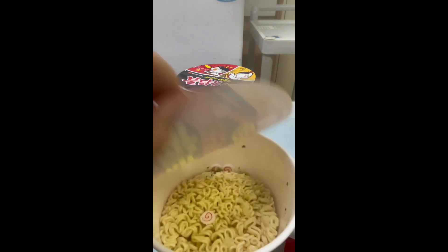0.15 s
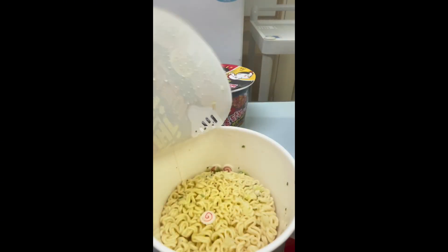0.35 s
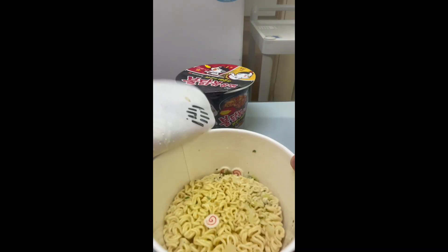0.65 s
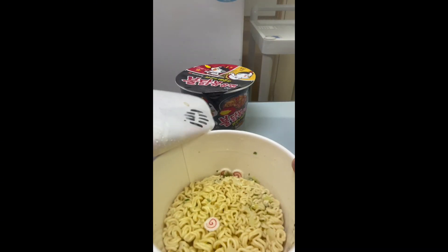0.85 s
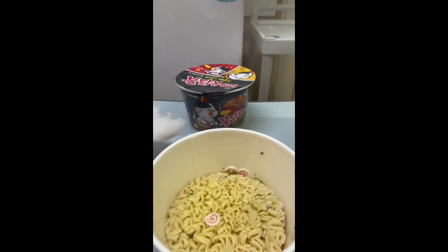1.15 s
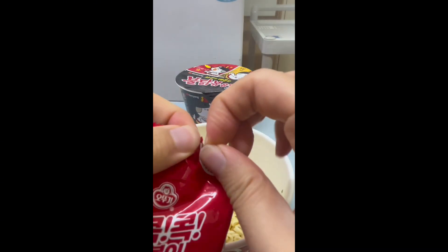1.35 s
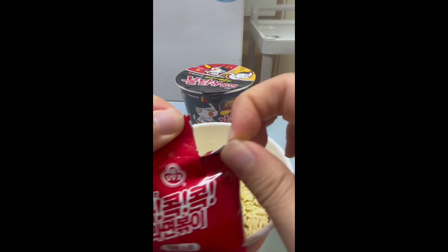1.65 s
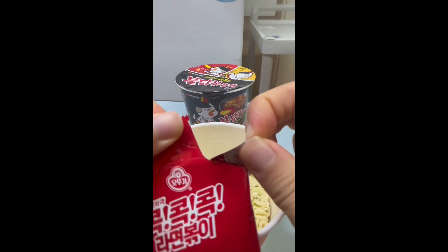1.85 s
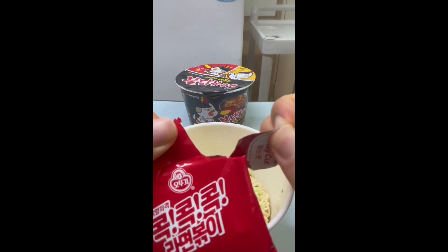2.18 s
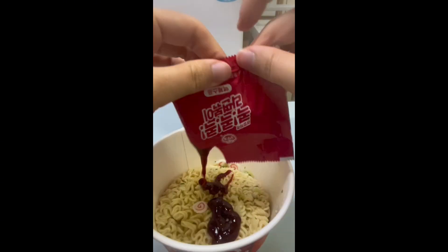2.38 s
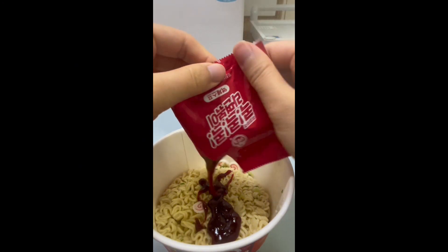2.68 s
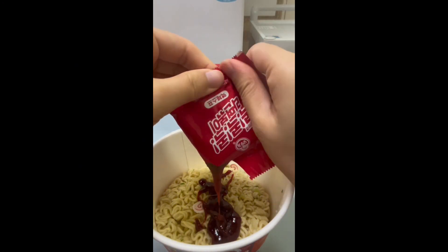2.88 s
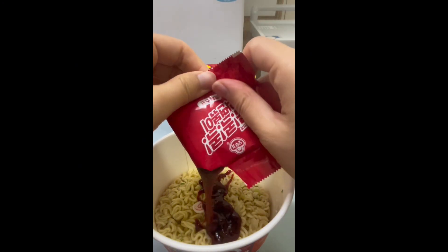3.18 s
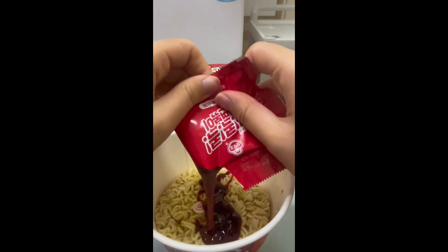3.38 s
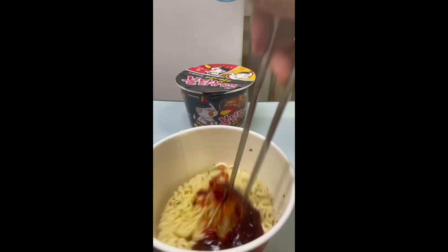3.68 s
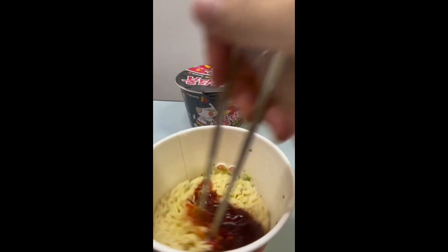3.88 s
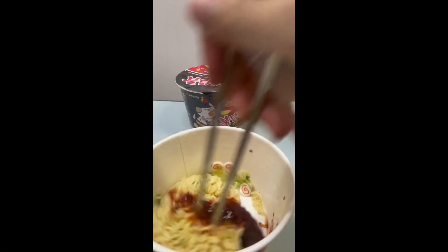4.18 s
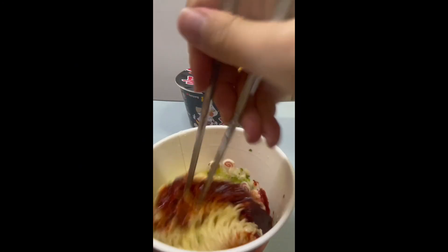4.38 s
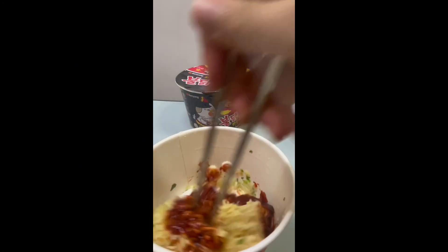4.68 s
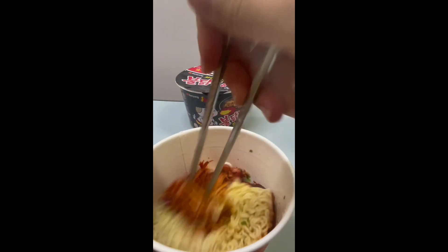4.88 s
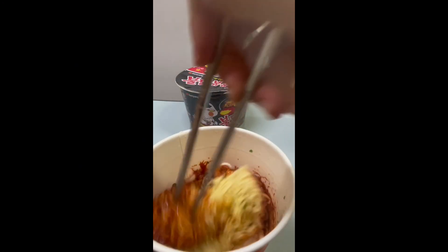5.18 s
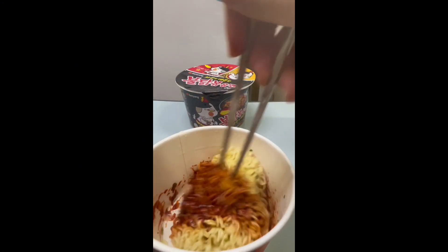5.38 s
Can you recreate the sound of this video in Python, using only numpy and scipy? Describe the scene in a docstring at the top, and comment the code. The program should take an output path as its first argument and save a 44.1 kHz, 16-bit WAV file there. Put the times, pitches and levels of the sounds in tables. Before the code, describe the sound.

Close up in a small, quiet kitchen, a paper lid comes off a cup with a quick rub and hollow pops. A plastic sauce pouch is picked up with soft flops and rustles, torn with sharp bright snaps, then squeezed with thin crackles. After a lull, chopsticks stir wet noodles, with sticky smacks and light knocks on the paper cup. A close stereo microphone catches little room echo.

```python
"""A paper lid is pulled off a cup of instant noodles, with a rub and a row of pops, in a small kitchen.
A plastic sauce pouch is then picked up, torn open and squeezed out; metal chopsticks stir the wet noodles
and knock on the paper cup. Rubbing is noise and tiny random catches, snaps and knocks are pushes into
damped resonances, squelches are short sinking tones, and the table is a low boom under the hands.
Two microphone ports hear it all, with short echoes, a room tail and quiet air."""
import sys
import numpy as np
from scipy import signal
from scipy.fft import rfft, irfft
from scipy.io import wavfile
from scipy.ndimage import uniform_filter1d

SR = 44100
rng = np.random.default_rng(int(sys.argv[2]) if len(sys.argv) > 2 else 0)


def bounce(signal):
    """Save signal as a 16-bit WAV file at the path given by the first command-line argument."""
    frames = np.transpose(np.atleast_2d(signal))
    limited = np.clip(frames, -1, 1)
    pcm = np.round(limited * 32767).astype(np.int16)
    wavfile.write(sys.argv[1], SR, pcm)


N = 244314

TIME = np.arange(N) / SR  # seconds
FFT_SIZE = 2 ** 18
HZ = np.fft.rfftfreq(FFT_SIZE, 1 / SR) + 1e-3  # just above zero, so it can be divided by

# Strokes of rubbing swell to a peak and die away; brightness is extra level in the treble
# columns: peak_s, rise_s, fall_s, level_db, brightness_db
LID_PEEL = [(0.044, 0.0082, 0.004, -38, -22), (0.061, 0.0039, 0.0056, -29.5, 2),
            (0.08, 0.029, 0.063, -49, 6.5), (0.3, 0.075, 0.061, -64.5, -11)]
PICKING_UP = [(0.495, 0.0045, 0.014, -57, 3.5), (0.585, 0.066, 0.21, -56.5, -4.5),
              (0.685, 0.0093, 0.023, -59.5, 1), (0.8, 0.014, 0.16, -49.5, -1),
              (0.98, 0.098, 0.11, -58.5, 0), (1.088, 0.018, 0.046, -43.5, -3),
              (1.25, 0.06, 0.038, -62, 4.5)]
TEARING = [(1.43, 0.00839, 0.03624, -50, -1), (1.465, 0.028, 0.025, -44, 5),
           (1.58, 0.022, 0.0033, -56.5, 8), (1.637, 0.015, 0.017, -54.5, 6.5),
           (1.815, 0.038, 0.014, -50, 5), (1.955, 0.025, 0.028, -56.5, 5.5),
           (1.985, 0.0295, 0.0082, -51, -26.5), (2.268, 0.011, 0.021, -46, -21.5),
           (2.287, 0.032, 0.0059, -46.5, 4.5), (2.33, 0.016, 0.081, -65.5, 7.5),
           (2.402, 0.006, 0.0054, -42, -6)]
STIRRING = [(3.74, 0.027, 0.079, -62.5, 4), (4.02, 0.042, 0.056, -66, 14.5), (4.19, 0.064, 0.044, -51, 1.5),
            (4.323, 0.024, 0.035, -55, 7), (4.43, 0.014, 0.044, -46.5, 2.5),
            (4.595, 0.01905, 0.058, -50, 1.5), (4.7, 0.04525, 0.14, -51.5, -5),
            (4.85, 0.017, 0.071, -51.5, 4), (4.955, 0.026, 0.059, -53.5, 3),
            (5.175, 0.048, 0.028, -52, 4.5), (5.255, 0.098, 0.041, -54, 4), (5.36, 0.039, 0.22, -55.5, -2),
            (5.52, 0.02104, 0.021, -49.5, 2)]
NOODLE_DRAG = (4, 0.74, 17.5, -62, -4)  # one such row: a long stroke under all the stirring
PAPER_HZ = 900  # the ring at which the thud rules for paper and creases are set
CREASE_SLIP_S, CREASE_THUD_DB = 0.0013046, -12.5  # thud is relative to the ring


def pouch():
    """The plastic pouch rustles in the hands, tears along its top and crackles as it is squeezed."""
    # Strokes of the squeeze: peak_s, rise_s, fall_s, level_db, brightness_db
    squeeze_strokes = [(2.67, 0.028, 0.055, -74.5, 19.5), (2.92, 0.18, 0.33, -65, 6),
                       (3.2, 0.059, 0.1, -94, 10), (3.52, 0.071, 0.0096, -55, -9),
                       (3.66, 0.043, 0.13, -66, -25)]
    # Tone of the rubbing: pitch_hz, level_db (relative)
    picking_tone = [(130.0, 14), (300.0, 4), (550.0, 6.5), (850.0, 8.5), (1150.0, -0.5), (1600.0, -3.5),
                    (2500.0, -6.5), (3700.0, -6), (4700, -11.5), (5600, -14), (6600, -14), (8000.0, -13),
                    (11000.0, -26.5), (15000.0, -24)]
    pouch_tone = [(130.0, 6), (300.0, 2.5), (550.0, 2.5), (850.0, -0.5), (1150.0, -3), (1600.0, -14.5),
                  (2500.0, -8.5), (3700.0, -9), (5500.0, -6.5), (8000.0, -9.5), (11000.0, -11),
                  (15000.0, -17)]
    # The taut film snaps as it is gripped and torn; tautness narrows the resonances
    # columns: start_s, thud_db, ring_db, ring_hz, crack_db, crack_hz, slip_s, tautness (plain factor)
    film_rows = [(0.5942, -61, -42.5, 880, -45, 4400, 0.0015, 0.88),
                 (0.7885, -46, -42, 1252, -38, 4140, 0.0018, 0.91),
                 (1.0823, -50, -35, 820, -29.5, 5700, 0.0038, 0.57),
                 (1.2686, -55, -35, 1080, -29, 2550, 0.0016, 1.8),
                 (1.2692, -50, -29.5, 2480, -27.5, 4570, 0.0012, 6.1),
                 (1.335, -50, -49, 1000, -31.5, 4130, 0.0027, 1.2),
                 (1.412, -30, -14.5, 2420, -9.5, 9250, 0.0014, 1.78),
                 (1.4472, -56, -53, 2540, -28, 6950, 0.0015, 2.8),
                 (1.4594, -59, -31, 2520, -30, 6600, 0.00113, 1.1),
                 (1.4632, -60, -23.5, 2640, -41, 3990, 0.0027, 2),
                 (1.472, -54, -34.5, 1450, -44, 4500, .0015, 1.2),
                 (1.4833, -65, -35, 2600, -43, 6210, 0.0014, 3),
                 (1.498, -48, -31, 2660, -39, 6140, 0.00209, 2.9),
                 (1.572, -69, -36, 2910, -52, 5694, 0.00176, 2.4),
                 (1.5797, -63, -29, 2890, -42.5, 5691, 0.0026, 4.1),
                 (1.611, -63, -35, 2560, -35, 5500, 0.0043, 2.1),
                 (1.6155, -61, -37, 3120, -38.5, 5600, 0.0014, 1.6),
                 (1.658, -65, -47.5, 1280, -41, 5700, 0.0015, 1.1),
                 (1.6796, -71, -40, 2860, -37.5, 7840, 0.0022, 2.3),
                 (1.7377, -52, -43, 880, -41, 2888, 0.00099, 1.1),
                 (1.758, -60, -44, 1610, -51, 7410, 0.00064, 0.66),
                 (1.7734, -64, -44, 1830, -31, 7380, 0.0009, 1.2),
                 (1.7799, -55, -42, 1064, -30, 6876, 0.00127, 1.1),
                 (1.8093, -63, -33, 2060, -33.5, 4700, 0.0019, 4.8),
                 (1.8148, -40.5, -28, 1950, -29, 4540, 0.003, 1.7),
                 (1.9002, -65, -42.5, 1510, -39, 6394, 0.0031, 0.84),
                 (1.9194, -59.5, -28, 1896, -25.5, 6327, 0.001, 1.04),
                 (2.1975, -55, -49, 2334, -29, 7200, 0.00093, 1.94),
                 (2.205, -50, -51, 1210, -38.5, 6987, 0.00088, 1.2),
                 (2.2542, -40, -42, 2037, -24.5, 9350, 0.00038, 1.5),
                 (2.2643, -38, -35.5, 1158, -37, 7610, 0.0013, 2.4),
                 (2.2822, -40, -36, 1320, -28.5, 5827, 0.0049, 1.9),
                 (2.2897, -41, -40, 1252, -24.5, 4970, 0.001, 3.7),
                 (2.392, -52, -51, 1840, -36.5, 7950, 0.0084, 0.66),
                 (2.4005, -38.5, -35.5, 1530, -25.5, 6240, 0.0027, 2.3)]
    # Creases click in the slack pouch as it is squeezed: start_s, crack_db, ring_db, ring_hz
    crease_rows = [(2.624, -40, -55, 2100), (2.6434, -24.5, -40, 2170), (2.6459, -21.5, -32.5, 2240),
                   (2.7749, -32, -47.5, 1960), (2.824, -46.5, -43, 1660), (2.85, -46, -46, 2330),
                   (2.8618, -35, -53, 2420), (2.8887, -30, -38.5, 1900), (2.9046, -38, -39, 1520),
                   (2.924, -40, -43, 2300), (2.936, -26.5, -41.5, 1730), (2.957, -42, -45.5, 1400),
                   (2.9821, -44, -38.5, 1440), (3.014, -60, -48.5, 1390), (3.066, -41, -44, 1730),
                   (3.081, -44, -59, 2204), (3.105, -53, -44, 1380), (3.251, -45.5, -47, 1740),
                   (3.3729, -41, -52.5, 1900), (3.383, -50, -54, 2000), (3.4104, -47.5, -50.5, 1700),
                   (3.436, -42, -44.5, 1270), (3.4527, -40, -40.5, 2020), (3.487, -38, -47, 1960),
                   (3.517, -35, -39.5, 2100), (3.55, -63, -47.5, 1500),]
    picking = friction(PICKING_UP, (-2.5, -3.5, -4.5), picking_tone,
                       grains_per_s=760, spread_db=2.0, smooth=0.74, pitched=0.36)
    picking = picking * clumps(depth_db=2.0, rate_hz=35)
    tearing = friction(TEARING + squeeze_strokes, (-6, -4, -4.5), pouch_tone,
                       grains_per_s=1000, spread_db=3.0, smooth=0.46, pitched=0.36)
    rows = film_rows + [crease(*row) for row in crease_rows] + tear_ticks()
    clicks = snaps(rows, thud_hz=340.0, ring_q=0.96, crack_q=0.46, chatter=0.16)
    return picking + swish() + tearing + buckle(flops(), lag_cycles=1.6) + buckle(clicks, lag_cycles=0.888)


def crease(s, crack_db, ring_db, ring_hz):
    """A crease flips in slack film: a thin click; low-ringing ones thud most, high-ringing ones are tauter."""
    thud_db = ring_db + CREASE_THUD_DB - 11.5 * np.log2(ring_hz / PAPER_HZ)
    tautness = (ring_hz / 1800) ** 1.96
    return s, thud_db, ring_db, ring_hz, crack_db, 7160, CREASE_SLIP_S, tautness


def tear_ticks():
    """The tear runs on in rows of tiny ticks: the film gives way a little at a time, at an uneven pace."""
    # Runs of ticks: start_s, end_s, level_db, crack_hz
    run_rows = [(1.426, 1.468, -47, 6800), (1.616, 1.647, -50, 5500), (1.786, 1.811, -44, 4850),
                (1.948, 1.973, -48, 6600), (2.217, 2.274, -46, 6800)]
    ticks_per_s, jitter, spread_db = 180, 0.22, 2.5  # jitter is a share of the gap between ticks
    rows = []
    for start, end, level_db, crack_hz in run_rows:
        times = np.arange(start, end, 1 / ticks_per_s)
        for s, (late, strength) in zip(times, rng.standard_normal((20, 2))):
            crack_db = level_db + spread_db * strength
            ring_db = crack_db - 10.5
            rows.append((s + jitter * late / ticks_per_s, ring_db + CREASE_THUD_DB, ring_db, 2200,
                         crack_db, crack_hz, CREASE_SLIP_S, 2.6))
    return rows


def flops(size=2048):
    """The soft wall of the full pouch turns over in one push: a dull slap, a ring and hardly any crack."""
    # Flops of the wall: start_s, ring_db, ring_hz, slap_db
    flop_rows = [(0.767, -43.5, 970, -60), (0.803, -40.5, 550, -49), (0.8426, -36, 750, -43),
                 (0.8618, -36.5, 1080, -39), (0.898, -35, 765, -67), (0.9251, -34.5, 800, -67),
                 (1.065, -42.5, 1400, -45.5), (1.0865, -28, 710, -34), (1.1998, -32.5, 840, -46),
                 (1.2142, -32, 776, -37), (1.321, -24, 1953, -23.5), (1.9381, -32, 767, -37.5),
                 (2.0394, -42, 900, -40), (2.0763, -71.5, 1098, -46)]
    out, t, push = np.zeros(N), np.arange(size) / SR, signal.unit_impulse(size)
    soft = signal.butter(6, 2630, fs=SR, output="sos")  # keeps the treble out of slap and ring
    slap = unit_blow(signal.sosfilt(soft, resonate(push, hz=1950, q=0.59)))
    thud = amp(-15.5) * unit_blow(resonate(push, hz=390.0, q=1.0))
    for s, ring_db, ring_hz, slap_db in flop_rows:
        ring = unit_blow(signal.sosfilt(soft, resonate(push, ring_hz, q=1.42)))
        slips = rng.standard_normal(size) * np.exp(-t / .0016)
        crack = amp(-16.5) * unit_blow(resonate(slips, hz=4500, q=0.51))
        add(out, s, amp(ring_db) * (ring + thud + crack) + amp(slap_db) * slap)
    return out


def swish():
    """Two smooth faces of film sing faintly as they slide: noise through one narrow resonance."""
    # One stroke: peak_s, rise_s, fall_s, level_db, brightness_db
    swish_stroke = (1.2, 0.05, 0.13, -59.5, 0)
    return force([swish_stroke]) * evened(resonate(rng.standard_normal(N), hz=5540, q=5))


def buckle(x, lag_cycles):
    """A buckle spreads over the sheet: low pitches come later than high ones, so a click sinks as it dies."""
    # well above 100 Hz each pitch is late by about the same number of its own cycles
    return shaped(x, np.exp(-2j * np.pi * lag_cycles * np.log(HZ + 100)))


def lid():
    """The paper lid rubs as it peels from the rim, and pops as it buckles and lets go."""
    # Pops of the lid: start_s, ring_db, ring_hz, crack_db, slip_s
    pop_rows = [(0.0331, -25.5, 810, -43, 0.014), (0.043, -37, 1020, -48, 0.0025),
                (0.0465, -20.5, 1060, -26.5, 0.0051), (0.052, -26, 750, -40, 0.0025),
                (0.0599, -24, 990, -28.5, 0.00086), (0.0622, -23, 960, -28.5, 0.00076),
                (0.066, -23.5, 740, -47, 0.0036), (0.1165, -29.5, 654, -60, 0.0055),
                (0.168, -40, 880, -63, 0.00625)]
    # Tone of the rubbing: pitch_hz, level_db (relative)
    lid_tone = [(130.0, 2), (330, 9), (550.0, 5.5), (850.0, 0), (1600.0, -10.5), (2300, -12.5),
                (3300.0, -6), (4500.0, -20.5), (11000.0, -48)]
    peel = friction(LID_PEEL, (-2, -2, -7), lid_tone, grains_per_s=900, spread_db=1.5, smooth=1.0, pitched=0.56)
    pops = snaps(paper_blows(pop_rows, crack_hz=2650), thud_hz=365.0, ring_q=1.8, crack_q=0.63, chatter=0.17)
    return cup(peel + pops, ring_db=-16.5)


def creak():
    """A finger sticks and slips on the cup: a train of taps at a changing pace, each ringing the wall."""
    # Pace of the slips: time_s, slips_per_s, level_db
    creak_rows = [(0.6773, 267, -38), (0.688, 123, -43), (0.698, 550, -44), (0.707, 210, -46)]
    s, rate, level_db = np.transpose(creak_rows)
    turns = np.cumsum(np.interp(TIME, s, rate, left=0, right=0)) / SR
    slips = np.diff(np.ceil(turns), prepend=0) * amp(np.interp(TIME, s, level_db))  # one tap per whole turn
    tap = signal.unit_impulse(1024)
    wall = unit_blow(resonate(tap, hz=880, q=2.9)) + amp(-7.5) * unit_blow(resonate(tap, hz=1900, q=2.8))
    return signal.oaconvolve(slips, wall)[:N]


def stirring():
    """Sticky noodles part in smacks and squelches, sauce ticks, and the chopsticks scrape and knock."""
    # Chopsticks strike the cup: start_s, ring_db, ring_hz, crack_db, slip_s
    knock_rows = [(4.011, -65, 1508, -43.5, 0.00172), (4.155, -35, 1220, -58, 0.0056),
                  (4.3185, -39, 1280, -51, 0.0063), (4.4174, -29.5, 1560, -35, 0.0018),
                  (4.4225, -25.5, 1400, -50, 0.0014), (4.4428, -35, 1295, -41, 0.0075),
                  (4.593, -39.5, 1200, -59, 0.001787), (4.841, -63, 1308, -39, 0.00756),
                  (4.8577, -40.5, 1900, -36, 0.0047), (4.8661, -33, 880, -54, 0.0028),
                  (4.9627, -36.5, 942.9, -60, 0.0033), (5.172, -38.5, 1310, -52, 0.0053),
                  (5.2369, -36.5, 900, -39.5, 0.00819), (5.2586, -37.5, 900, -44, 0.0059),
                  (5.5046, -30.5, 1000, -62, 0.016), (5.5135, -47, 965, -34, 0.007)]
    # Tone of the rubbing: pitch_hz, level_db (relative)
    noodle_tone = [(130.0, 6), (300.0, 2), (550.0, -7.5), (850.0, 2), (1150.0, -5.5), (1600.0, -10.5),
                   (2500.0, -12.5), (3700.0, -7.5), (5500.0, -4.5), (8000.0, -8.5), (11000.0, -10),
                   (15000.0, -12.5)]
    strokes = STIRRING + [NOODLE_DRAG]
    noodles = friction(strokes, (-4, -2.5, -4.5), noodle_tone,
                       grains_per_s=1300, spread_db=3.0, smooth=0.93, pitched=0.63)
    wet = evened(resonate(catches(per_s=60, spread_db=6.5), hz=7500, q=0.38))
    ticks = amp(-13.5) * force(strokes) * wet
    knocks = snaps(paper_blows(knock_rows, crack_hz=4400), thud_hz=430, ring_q=1.27, crack_q=0.42, chatter=0.12)
    return noodles * clumps(depth_db=1.0, rate_hz=54) + ticks + cup(knocks + squelches(), ring_db=-16.0)


def squelches(count=12, size=1500):
    """Pockets of air open in turn in the sauce; each rings a few cycles and sinks in pitch as it widens."""
    # Wet noodles pull apart: start_s, length_s, level_db, pitch_hz
    squelch_rows = [(4.166, .045, -47, 1290), (4.18, .035, -49, 900), (4.185, .022, -49, 2000),
                    (4.326, .016, -47.5, 1780), (4.401, .003, -47, 1251), (4.42, .026, -38, 2200),
                    (4.594, .003, -45, 1630), (4.65, .014, -50.5, 2016), (4.695, .01, -47.5, 970),
                    (4.839, .01, -41, 1867), (4.926, .003, -42.5, 1860), (4.928, .004, -40.5, 1299),
                    (4.948, .003, -36, 900), (4.975, .008, -41, 830), (5.151, .016, -53, 930),
                    (5.399, .01, -50.5, 1160)]
    pockets_per_s, fade_cycles, sink = 200, 2.36, 0.28  # sink: the pitch starts this share too high
    out, t = np.zeros(N), np.arange(size) / SR
    for s, length, level_db, hz in squelch_rows + stray_squelches(1 / pockets_per_s):
        # the first pocket opens at once, the rest at uneven gaps
        late = rng.random(count) * (np.arange(count) > 0)
        delays = (np.arange(count) + late) / pockets_per_s
        for delay, (pitch, strength) in zip(delays, rng.uniform(-1.3, 1, (count, 2))):
            if delay < length:
                cycles = t * hz * 2 ** (0.16 * pitch)
                age = cycles / fade_cycles
                turns = cycles + sink * fade_cycles * (1 - np.exp(-age))
                pocket = unit_blow(np.sqrt(age) * np.exp(-age) * np.sin(2 * np.pi * turns))
                add(out, s + delay, amp(level_db - 2.5 * strength) * pocket)
    return out


def stray_squelches(length_s, count=60):
    """Single air pockets at random times, about as strong as the stirring is at that moment."""
    times = rng.uniform(STIRRING[0][0], STIRRING[-1][0], count)
    effort_db = 20 * np.log10(np.interp(times, TIME, force(STIRRING + [NOODLE_DRAG])))
    return [(s, length_s, db + 1 + 1 * strength, 1400 * 2 ** (0.607 * pitch))
            for s, db, (strength, pitch) in zip(times, effort_db, rng.standard_normal((count, 2)))]


def cup(x, ring_db, size=6000):
    """Whatever touches the paper cup sets its wall and its air ringing."""
    # Ringing tones of the cup: pitch_hz, level_db, t60_s (time to die by 60 dB)
    cup_tones = [(747, 4, 0.075), (900, 7, 0.024), (1045, 2.5, 0.094)]
    t = np.arange(size) / SR
    ring = sum(amp(db - 60 * t / t60) * np.sin(2 * np.pi * hz * t) for hz, db, t60 in cup_tones)
    return x + amp(ring_db) * np.std(x) * evened(signal.oaconvolve(x, ring)[:N])


def paper_blows(rows, crack_hz):
    """Snaps of stiff paper: the larger the patch that moves, the lower it rings and the more it thuds."""
    return [(s, db - 8.5 - 20.5 * np.log2(hz / PAPER_HZ), db, hz, crack_db, crack_hz, slip_s, 1)
            for s, db, hz, crack_db, slip_s in rows]


def snaps(rows, thud_hz, ring_q, crack_q, chatter, size=3072):
    """Each snap is a sudden release and a dying run of micro-slips; the sheet thuds, rings and cracks."""
    out, t = np.zeros(N), np.arange(size) / SR
    for s, thud_db, ring_db, ring_hz, crack_db, crack_hz, slip_s, tautness in rows:
        slips = rng.standard_normal((2, size)) * np.exp(-t / max(slip_s, 1e-4))
        # a short slip is nearly one clean push, a longer one has more chatter
        push = unit_blow(1. * (t == 0)) + chatter * np.sqrt(abs(slip_s) * SR) * unit_blow(slips[0])
        # a large flap moves slowly
        push = signal.sosfilt(signal.butter(2, 2 * ring_hz, fs=SR, output="sos"), push)
        thud = amp(thud_db) * unit_blow(resonate(push, thud_hz, q=1.0))
        # the tauter the sheet, the narrower its resonances
        ring = amp(ring_db) * unit_blow(resonate(push, ring_hz, ring_q * tautness))
        crack = amp(crack_db) * unit_blow(resonate(slips[1], crack_hz, crack_q * tautness))
        # the higher the crack, the more its first instant glints at the very top
        edge = resonate(slips[0] * np.exp(-t / .0008), hz=13000, q=1)
        glint = amp(crack_db - 10) * (crack_hz / 9000) ** 2 * unit_blow(edge)
        add(out, s, thud + ring + crack + glint)
    return out


def friction(strokes, mix_db, colour, grains_per_s, spread_db, smooth, pitched, count=14):
    """Smooth sliding, soft catches, and small smacks that each ring at their own pitch."""
    smacks = np.zeros(N)
    for hz in np.geomspace(300, 10000, count):
        smacks += np.sqrt(hz) * evened(resonate(catches(grains_per_s / count, spread_db), hz, q=3.17))
    # fingers and noodles are soft, so their catches lack the top of the sliding hiss
    soft = signal.sosfilt(signal.butter(1, 4500, fs=SR, output="sos"), evened(catches(grains_per_s, spread_db)))
    drive = soft + pitched * evened(smacks) + smooth * rng.standard_normal(N)
    # three bands: rubbing below 1200 Hz, crinkle between, fizz above 3500 Hz; mix_db has one level for each
    below, above = 1 / (1 + (HZ / 1200) ** 6), 1 / (1 + (3500 / HZ) ** 8)
    body = amp(read(colour, HZ)) / (1 + (100 / HZ) ** 4)
    bands = shaped(drive, body * np.array([below, 1 - below - above, above]))
    bands /= np.sqrt(uniform_filter1d(bands ** 2, size=2200) + 1e-18)  # the hand sets the force of the stroke
    return sum(amp(mix_db[k]) * force(strokes, k / 2) * band for k, band in enumerate(bands))


def force(strokes, bright_share=0):
    """Gain over time of a set of strokes; higher bands take a greater share of a stroke's brightness."""
    power = np.zeros(N)
    for s, rise_s, fall_s, level_db, bright_db in strokes:
        away = np.minimum(np.maximum((s - TIME) / rise_s, (TIME - s) / fall_s), 20)
        power += amp(level_db + bright_share * bright_db) ** 2 * np.exp(-2 * away)
    return np.sqrt(power)


def catches(per_s, spread_db):
    """A random train of tiny releases of unequal size."""
    sizes = amp(spread_db * np.minimum(rng.exponential(1, N), 4))
    return sizes * np.sign(rng.standard_normal(N)) * (rng.random(N) < per_s / SR)


def clumps(depth_db, rate_hz):
    """A random gain: things stick for a moment, then let go in a clump."""
    sway = signal.sosfilt(signal.butter(2, rate_hz, fs=SR, output="sos"), rng.standard_normal(N))
    return evened(amp(depth_db * evened(sway)))


def bumps(count=5):
    """Soft weight bumps and drags: dull low grains, ringing at a few pitches, under the handling."""
    # Full pouch, gripping fingers, lump of noodles: peak_s, rise_s, fall_s, level_db, brightness_db
    bump_strokes = [(0.808, .006, 0.38, -56, 0), (2.92, .06, 0.04, -74, 0), (3.45, 0.1, 0.14, -63.5, 0),
                    (4.85, 0.25, 1.1, -61, 0)]
    grains = np.zeros(N)
    for hz in np.geomspace(187, 527, count):
        grains += evened(resonate(catches(per_s=45, spread_db=6.0), hz, q=2.4))
    return force(bump_strokes) * evened(grains)


def table(size=9000):
    """The table top booms softly with the force of the hands and swings a few cycles after each nudge."""
    # The cup is nudged against the table: start_s, pitch_hz, level_db
    nudge_rows = [(0.587, 61, -48), (3.728, 60.05, -44.5), (4.316, 117, -48.5), (4.42, 124, -49)]
    lag_s = 0.033  # the table top takes about this long to follow the hands
    boom = signal.hilbert(resonate(rng.standard_normal(N), hz=65.5, q=1.86))
    strength = np.sqrt(uniform_filter1d(abs(boom) ** 2, size=2500))
    # peeling and picking up reach the table best, tearing least
    push = (amp(0) * force(LID_PEEL) * amp(1) + amp(-1.0) * force(PICKING_UP) + amp(-12.5) * force(TEARING)
            + amp(-8.0) * force(STIRRING + [NOODLE_DRAG]))
    keep = np.exp(-1 / (lag_s * SR))
    out = signal.lfilter([1 - keep], [1, -keep], push) * evened(boom.real / strength)
    t = np.arange(size) / SR
    for s, hz, level_db in nudge_rows:
        age = t * hz / 1.05  # the swing is greatest after 1.05 cycles
        add(out, s, amp(level_db) * age * np.exp(1 - age) * np.sin(2 * np.pi * hz * t))
    return out


def air():
    """Steady room air, filtered noise with a faint appliance whirr, partly different at each port."""
    # Tone of the air: pitch_hz, level_db (relative)
    air_tone = [(40, -12.5), (300, -10.5), (550, -9), (1000, -3.5), (1800, -14.5), (2500, -16.5),
                (3300, -16.5), (7000, -26), (15000, -70)]
    # Whirr of an appliance: pitch_hz, width_hz, level_db
    whirr_rows = [(62, 6.3, -82.5), (1037, 150, -75), (1550, 39, -77)]
    noise = rng.standard_normal((3, N))
    noise = noise[0] + 3.4 * noise[1:]
    whirr = sum(amp(db) * evened(resonate(noise, hz, hz / width)) for hz, width, db in whirr_rows)
    return amp(-66.5) * evened(shaped(noise, amp(read(air_tone, HZ)))) + whirr


def table_echo(x, size=600):
    """Echoes off the table and the things on it, opposite in sign at the two ports, tell them apart."""
    taps = rng.standard_normal(size) * signal.windows.hann(size)
    band = signal.butter(1, [220, 5000], "bandpass", fs=SR, output="sos")
    echo = signal.sosfilt(band, signal.oaconvolve(x, taps / np.linalg.norm(taps))[:N])
    return np.array([echo, -echo])


def kitchen(x, size=24000):
    """A diffuse noise tail for each port, every band dying at its own speed."""
    # How long the room rings: pitch_hz, t60_s (time to die by 60 dB)
    room_decay = [(200, 0.045), (2500, 0.43), (7000, 0.13), (15000, 0.04)]
    hz, t, z = signal.stft(rng.standard_normal((2, size)), SR, nperseg=256)
    tail = signal.istft(z * amp(-60 * t / read(room_decay, hz)[:, None]), SR, nperseg=256)[1]
    tail *= 1 - np.exp(-np.arange(tail.shape[1]) / SR / 0.0009)  # a soft start
    # long waves reach both ports alike
    shared = signal.sosfilt(signal.butter(1, 2500, fs=SR, output="sos"), tail[0] - tail[1])
    tail = np.array([tail[0], tail[1] + shared])
    return signal.fftconvolve(x[None], tail / np.linalg.norm(tail[0]), axes=1)[:, :N]


def ports(x):
    """Near sounds reach the two microphone ports with a phase gap that is widest in the treble."""
    # Left against right: pitch_hz, left_lead_radians, left_minus_right_db
    port_rows = [(100, 0, -.5), (550, -.1, -2), (1200, 0, -.3), (3000, 0, -2), (3700, .3, 1.5),
                 (4800, .3, 0), (6500, 1.45, .3), (9500, 2.8, -.8), (16000, 4.2, 1)]
    half = np.exp(.5j * read(port_rows, HZ)) * amp(read(port_rows, HZ, axis=2) / 2)
    return shaped(x, np.array([half, 1 / half]))


def microphone(x):
    """Each peak or hollow of the microphone in its case is one bell filter."""
    # Peaks and hollows: pitch_hz, q (sharpness), level_db
    bell_rows = [(2460, 2.25, 2), (3486, 2.48, -6.5)]
    for hz, q, db in bell_rows:
        turn, height = 2 * np.pi * hz / SR, amp(db / 2)
        damp, middle = np.sin(turn) / (2 * q), -2 * np.cos(turn)
        top = [1 + damp * height, middle, 1 - damp * height]
        bottom = [1 + damp / height, middle, 1 - damp / height]
        x = signal.lfilter(top, bottom, x)
    return x


def amp(db):
    """Decibels to gain."""
    return 10 ** (np.asarray(db) / 20)


def evened(x):
    """Scales to rms 1."""
    return x / np.sqrt(np.mean(x ** 2) + 1e-20)


def unit_blow(x):
    """Scales to the energy of one millisecond at rms 1."""
    return x * np.sqrt(SR / 1000 / (np.sum(x ** 2) + 1e-20))


def read(points, hz, axis=1):
    """Reads one column of a table between its rows, on a log-frequency axis."""
    columns = np.transpose(points)
    return np.interp(np.log(hz + 1), np.log(columns[0]), columns[axis])


def shaped(x, response):
    """Filters by a frequency response."""
    return irfft(rfft(x, FFT_SIZE) * response)[..., :N]


def resonate(x, hz, q):
    """A damped resonance, applied twice for steep skirts."""
    hz = min(hz, .4 * SR)
    turn = 2 * np.pi * hz / SR
    damp = np.sin(turn) / (2 * q)
    section = [damp, 0, -damp, 1 + damp, -2 * np.cos(turn), 1 - damp]
    return signal.sosfilt(np.array([section, section]) / (1 + damp), x)


def add(mix, s, sound):
    """Mixes a sound in at s seconds."""
    part = mix[max(round(s * SR), 0):][:len(sound)]
    part += sound[:len(part)]


def scene():
    """All the handling close by, in the kitchen; each action has its own echoes."""
    actions = [pouch(), lid() + creak(), stirring(), bumps() + table()]
    near = sum(actions)
    early = amp(-11) * sum(table_echo(action) for action in actions)
    return ports(near) + early + amp(-20.0) * kitchen(near) + air()


def record(dry):
    """The microphone's colour, then a low cut at 37 Hz and a high cut at 16 kHz."""
    low_cut = signal.butter(2, 37.01, "highpass", fs=SR, output="sos")
    lean = signal.sosfilt(low_cut, microphone(dry))
    high_cut = signal.firwin(255, 16000, window=("kaiser", 9), fs=SR)
    return signal.oaconvolve(lean, high_cut[None], "same")


dry = scene()
out = record(dry)
bounce(out)
```